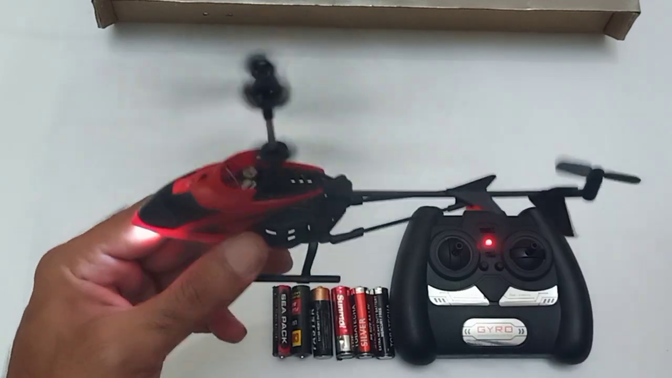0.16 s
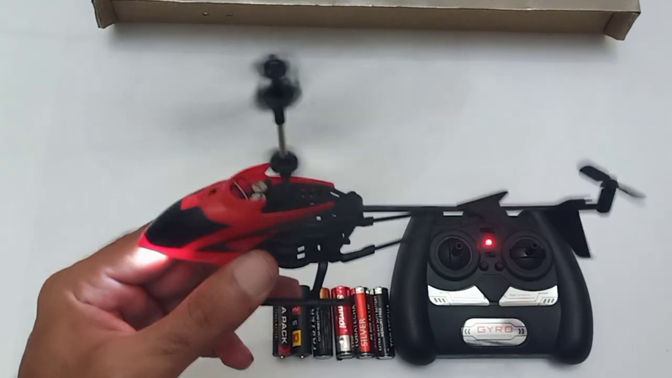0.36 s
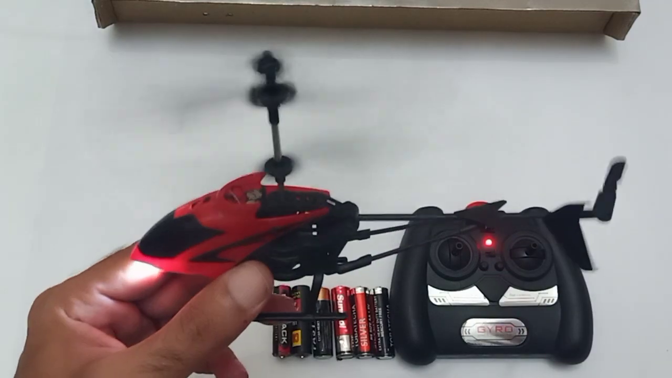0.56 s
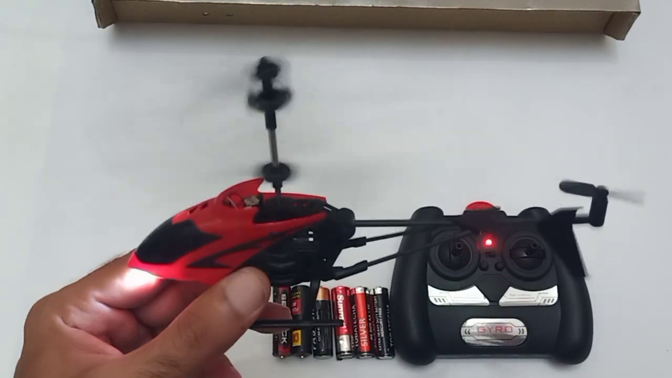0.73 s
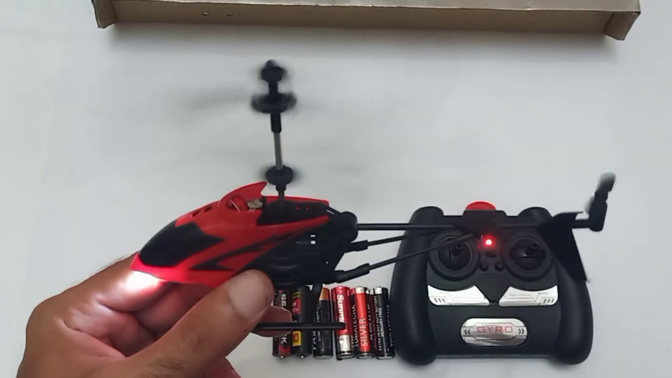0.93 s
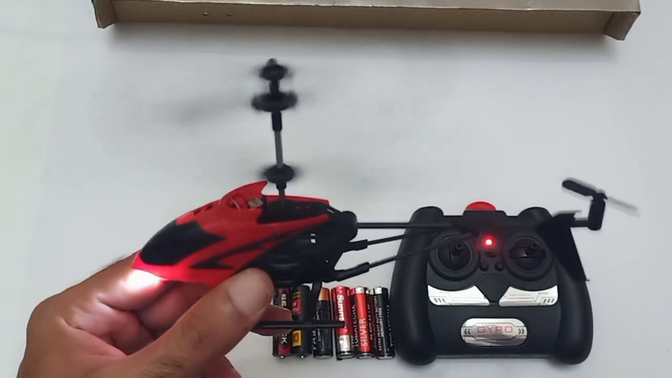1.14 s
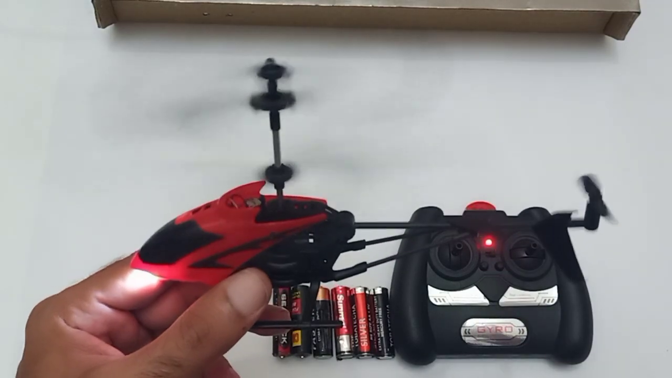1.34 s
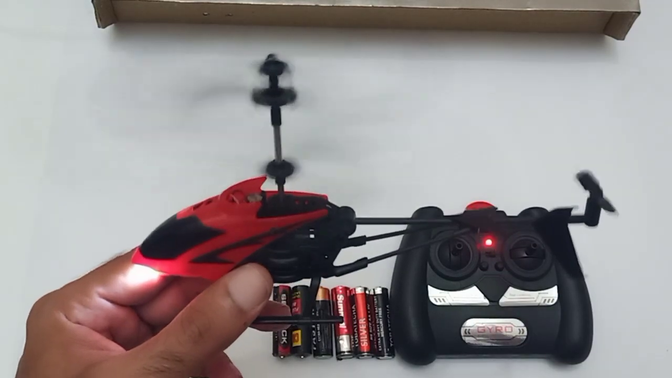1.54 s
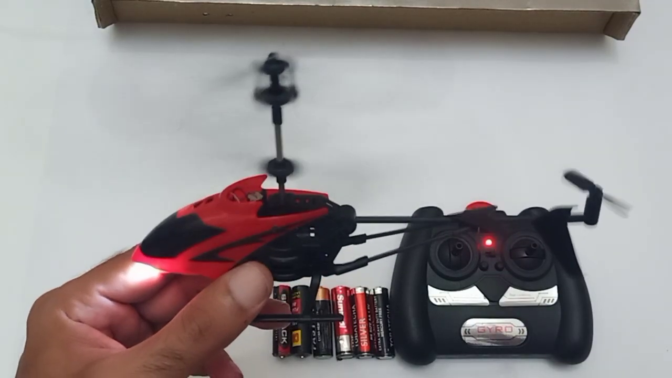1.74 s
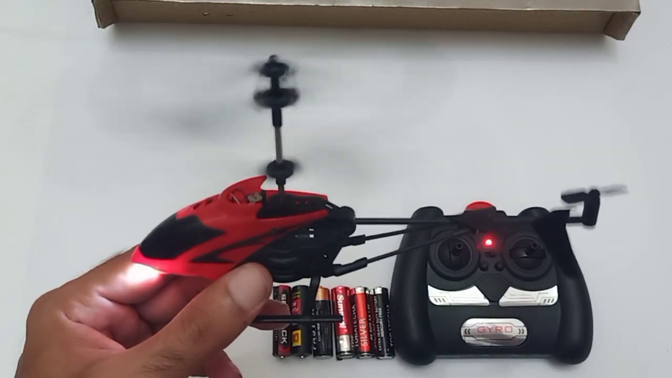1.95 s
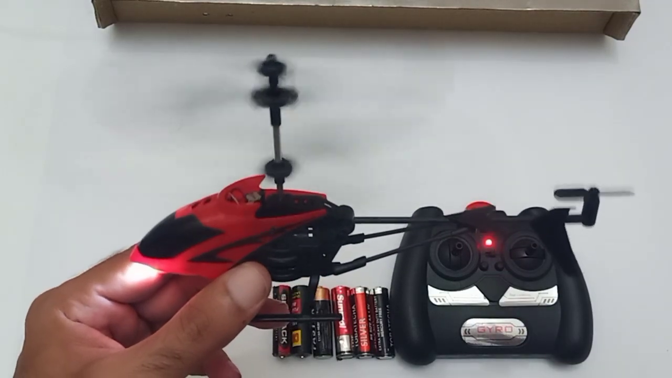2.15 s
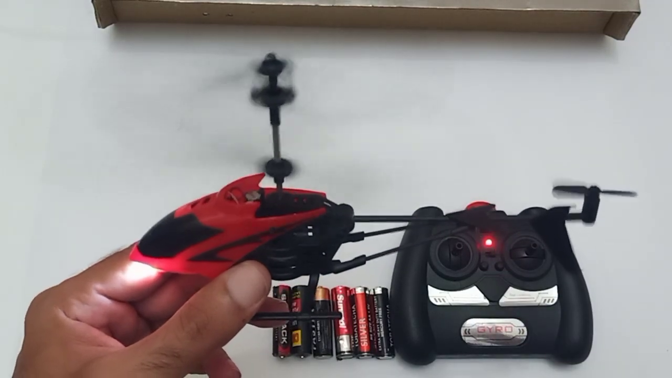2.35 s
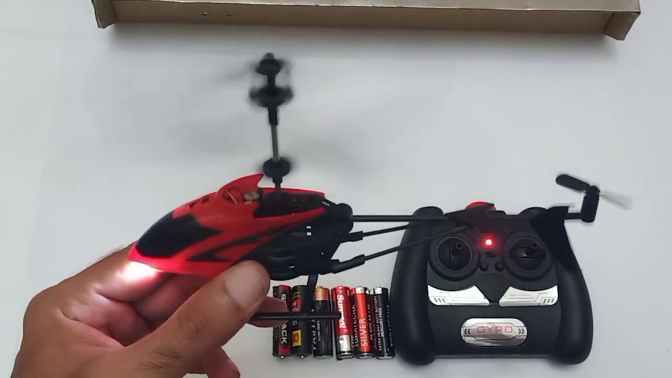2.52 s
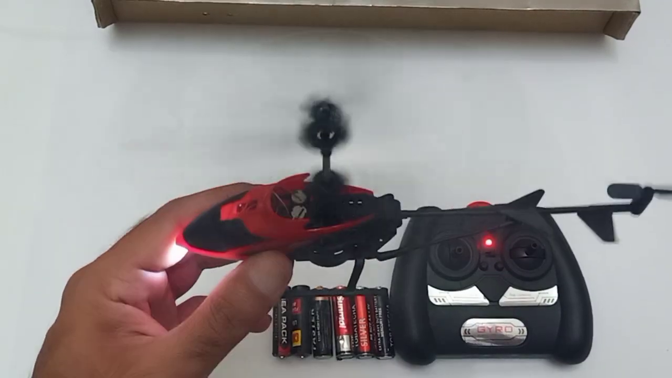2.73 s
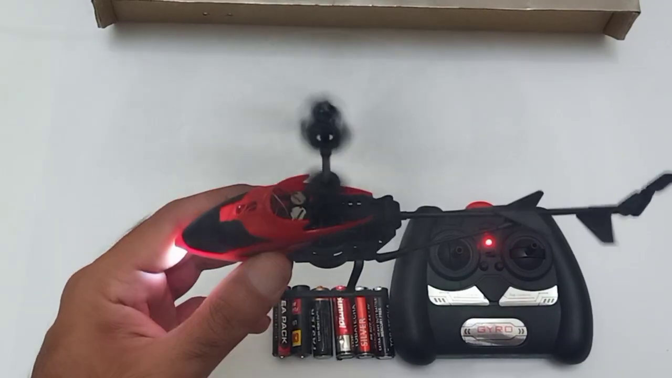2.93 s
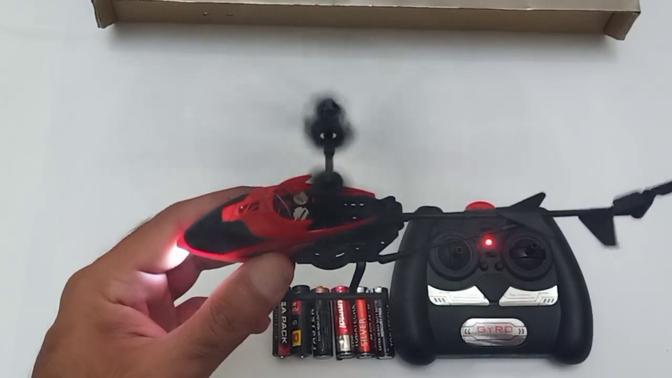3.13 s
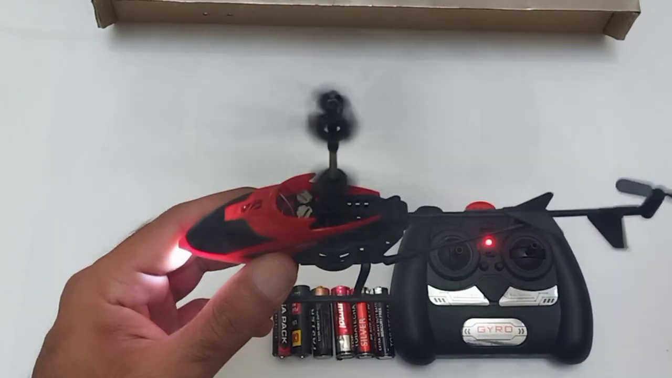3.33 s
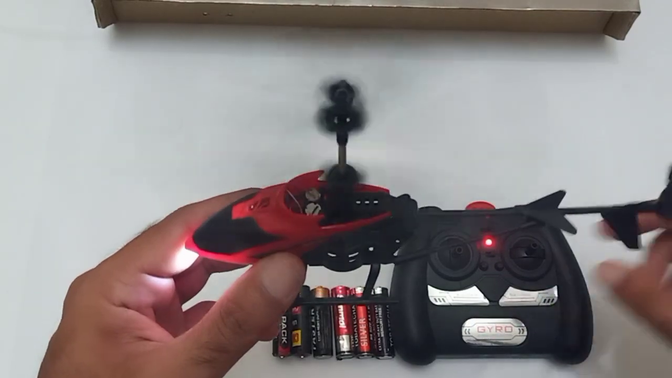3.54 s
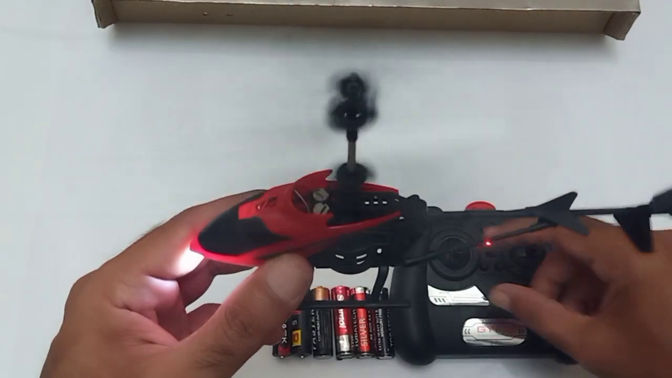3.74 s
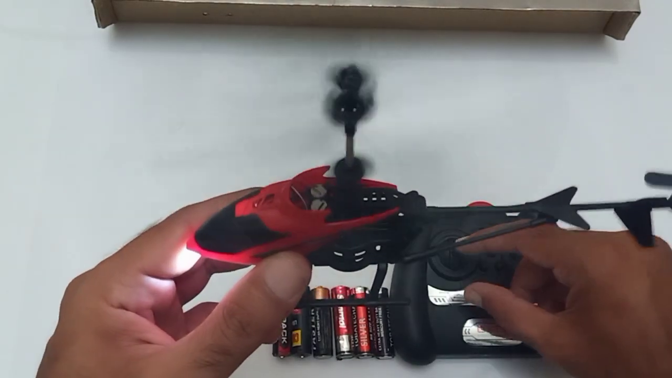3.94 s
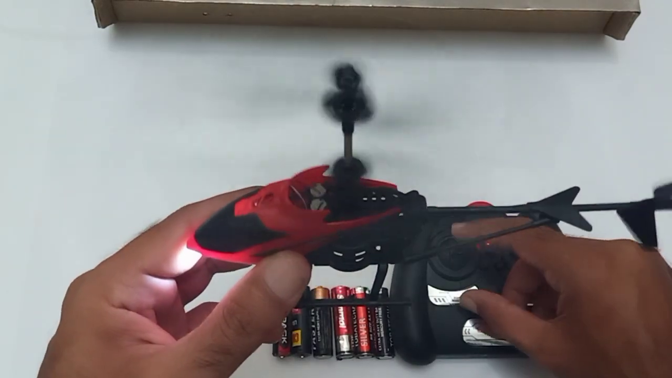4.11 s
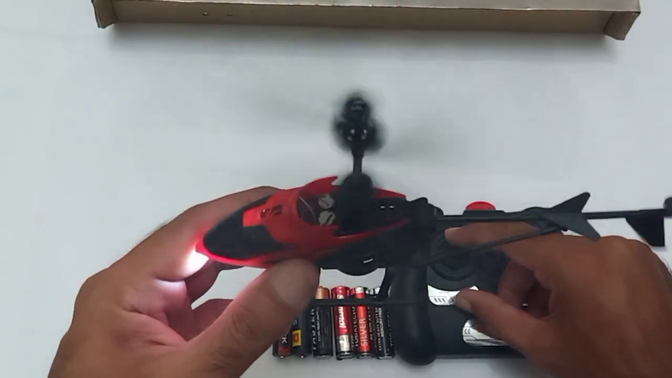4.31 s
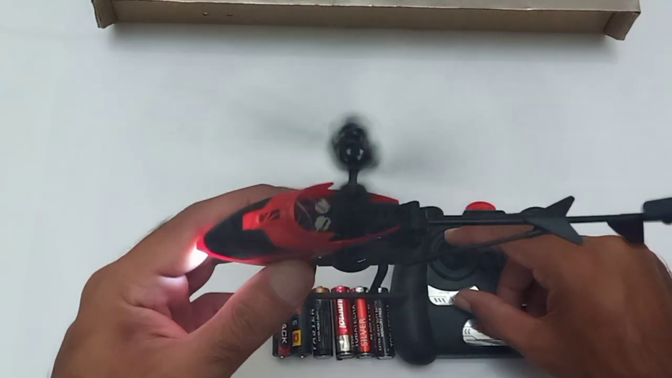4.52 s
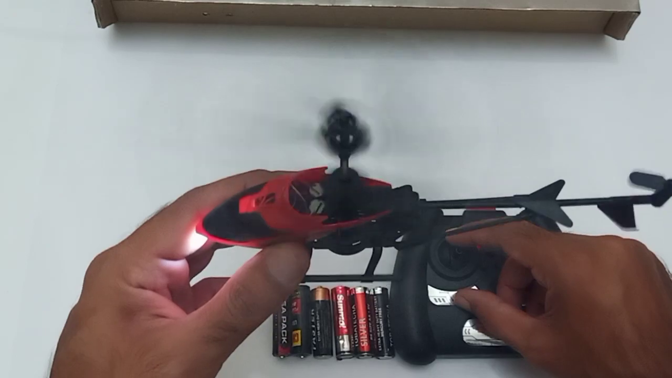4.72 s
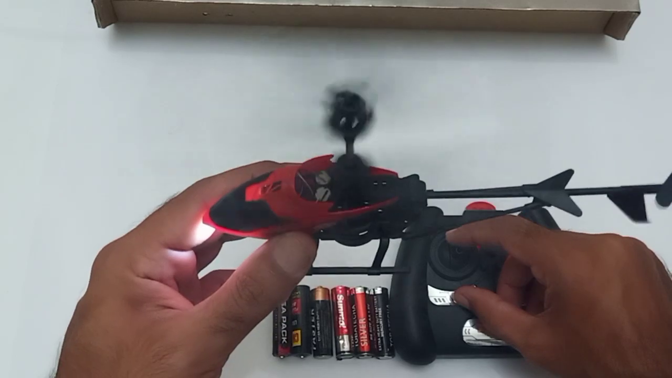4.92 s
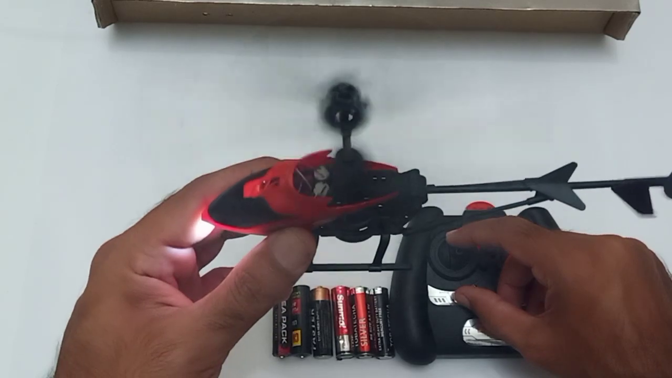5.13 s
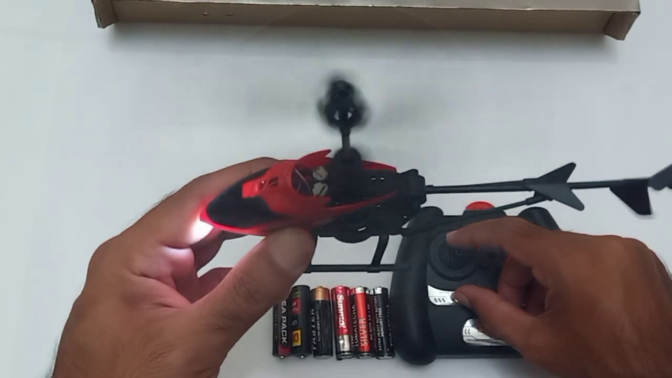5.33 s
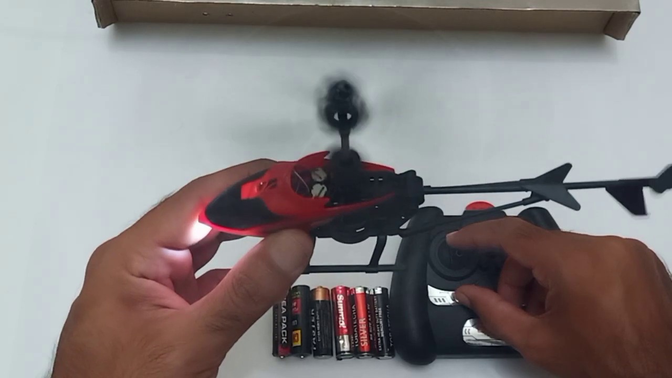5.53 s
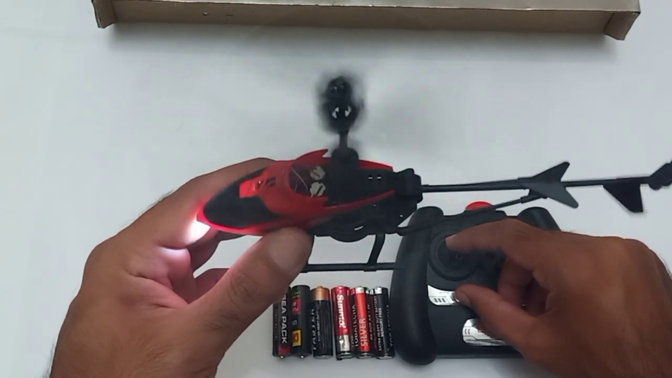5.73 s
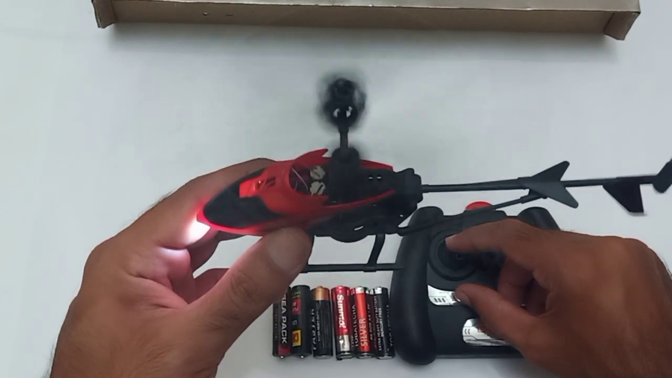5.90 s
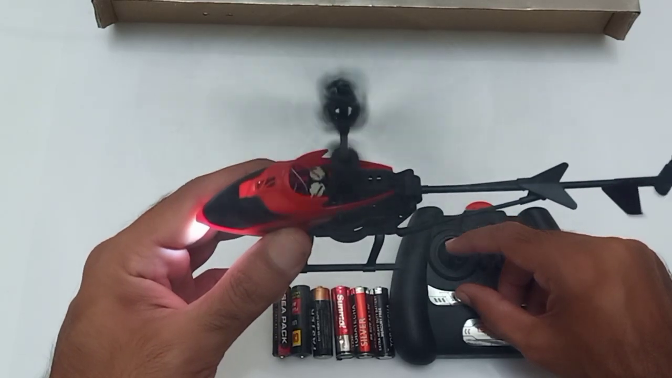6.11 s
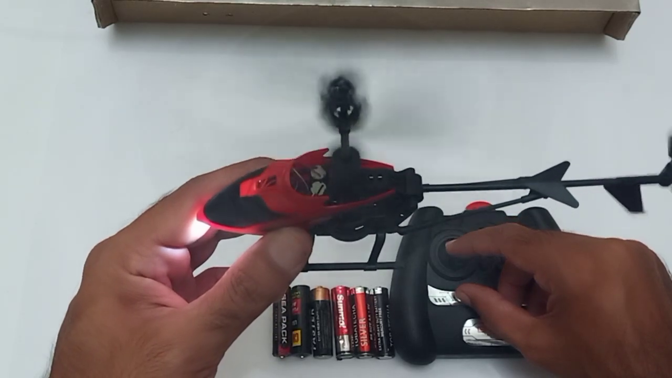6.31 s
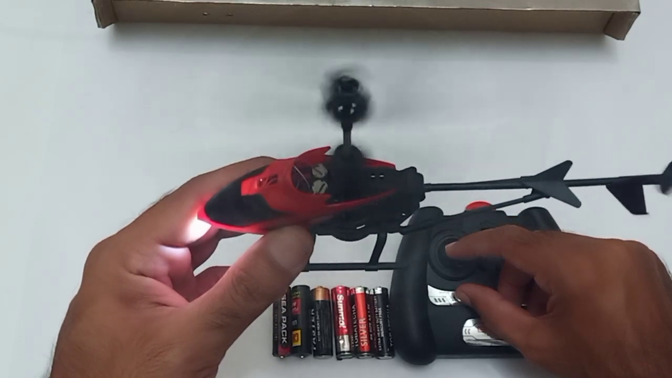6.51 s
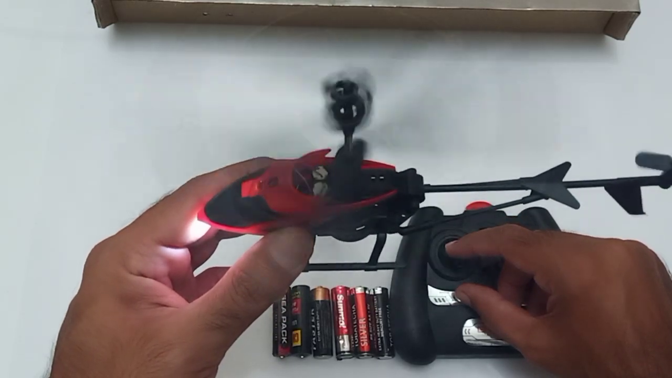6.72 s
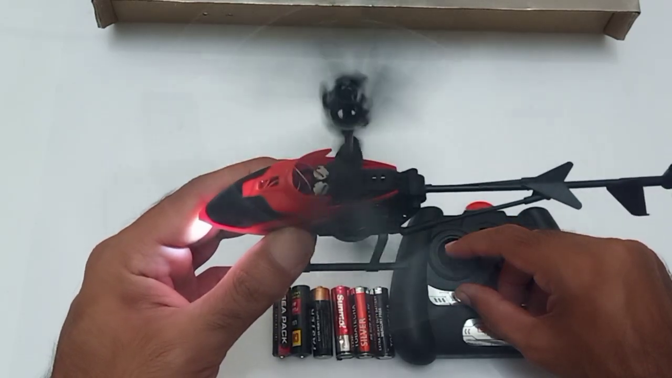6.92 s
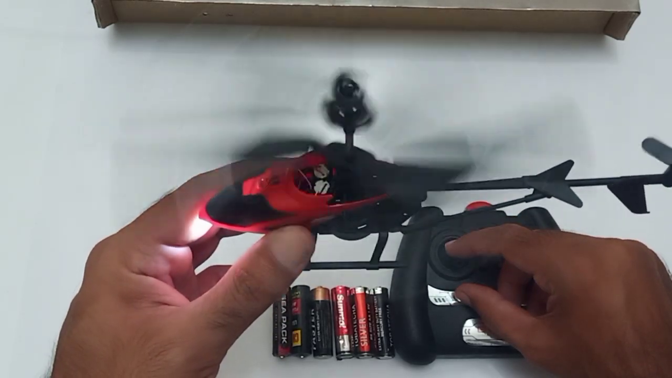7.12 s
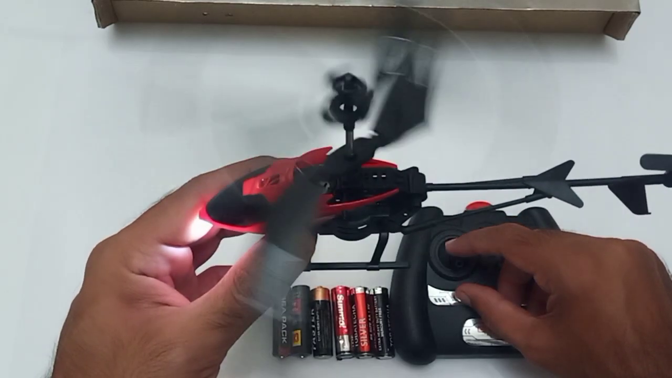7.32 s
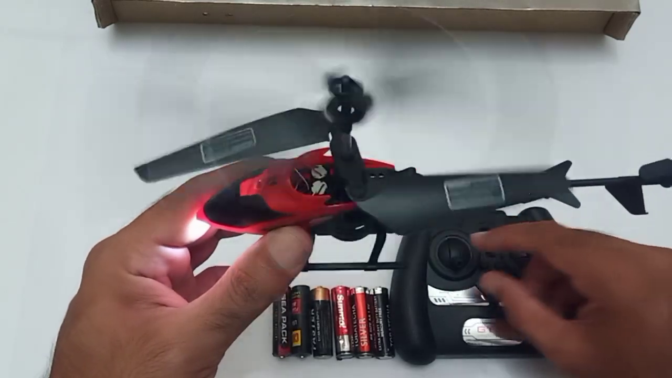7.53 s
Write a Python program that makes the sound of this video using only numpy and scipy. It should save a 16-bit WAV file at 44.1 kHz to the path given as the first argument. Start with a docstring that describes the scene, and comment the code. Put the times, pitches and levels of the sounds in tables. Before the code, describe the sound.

Bright, raspy plastic gear rattle and small motor whine run close up, cut by one brief silence, then slow into uneven ticking knocks indoors.

```python
"""Hand-held toy helicopter running down

A toy helicopter is held in one hand above a desk; two small motors drive counter-turning rotors.
Loose plastic gears rattle (pulsed noise through shell resonances), pinions whine (sines on shaft orders)
and blades throb (beating sines and low noise). The sound drops out for an instant; then power is cut and
the gears coast down, knocking in their play (decaying pulses), over a faint room noise and hum."""
import sys
import numpy as np
from scipy import signal
from scipy.fft import rfft, irfft
from scipy.io import wavfile
from scipy.ndimage import uniform_filter1d

SR = 44100
rng = np.random.default_rng(int(sys.argv[2]) if len(sys.argv) > 2 else 0)


def wrap_up_sound(samples):
    """Save the sound to the file named by the first command line argument, as 16-bit audio."""
    columns = np.atleast_2d(samples).T
    # keep every value between -1 and 1, then stretch to whole-number steps
    tamed = np.clip(columns, -1, 1)
    steps = np.round(tamed * 32767).astype(np.int16)
    wavfile.write(sys.argv[1], SR, steps)


def boost(x):
    """Linear amplitude factor 10**(x/20) for a level x in decibels (scalar or array-like)."""
    u = np.asarray(x, float) / 20
    return 10 ** u


N = 333396
T = np.arange(N) / SR
HZ = np.fft.rfftfreq(N, 1 / SR)

POWER_OFF_S = 6.428
GEAR_RATIO = 10  # shaft turns per rotor turn
FULL_SPEED = (400, 350)  # fast and slow shaft [turns/s]

# mean shaft speeds under power: (time [s], fast shaft [turns/s], slow shaft [turns/s])
POWERED_SPEED = [(0.0, 396.6, 353.8), (0.3, 396.3, 345.0), (0.65, 398.0, 336.5), (1.0, 398.3, 342.0),
                 (1.5, 401.5, 353.8), (1.8, 404.0, 351.4), (2.25, 400.2, 356.6), (2.55, 399.3, 355.3),
                 (2.73, 394.2, 354.5), (3.15, 395.3, 344.6), (3.65, 395.5, 341.9), (4.2, 393.2, 345.6),
                 (4.75, 391.8, 339.0), (4.95, 391.5, 338.9), (5.4, 384.6, 341.6), (5.65, 382.0, 334.0),
                 (5.9, 370.5, 320.7), (6.4, 356.5, 295.0)]
# mean shaft speeds while coasting: (time [s], fast shaft [turns/s], slow shaft [turns/s])
COASTING_SPEED = [(6.548, 270, 190), (6.702, 190, 100), (6.85, 165, 110), (7.101, 130, 55),
                  (7.299, 130, 28), (7.56, 100, 11)]
# how the hand holds the toy: (time [s], loudness [dB], side-on [0 to 1], roll [about -1 to 1])
POSE = [(0.0, 1, 0.3, -0.82), (0.35, 0, 0.67, -0.024), (0.75, 0.5, 0.7, -0.062), (1.0, -0.5, 0.77, 0.26),
        (1.35, 0.5, 0.9, 0.26), (1.7, 0.5, 0.95, 0.094), (2.1, 3.5, 0.72, -1.4), (2.55, 1, 0.81, -0.25),
        (2.75, 2, 0.5, -0.73), (3.0, 1.5, 0.13, -.8), (3.3, -0.5, 0.04, -0.48), (3.9, 0, 0.02, -0.55),
        (4.4, 0, 0, -0.098), (4.8, -0.5, 0.03, 0.22), (5.4, -0.5, 0, -0.26), (5.8, -1.5, 0.22, 0.18),
        (6.2, -2.5, 0, 0.062), (6.37, -4.5, .3, 0.56), (6.42, -9, 0.45, 1)]

# broad spectrum of the gear rattle: (frequency [Hz], relative level per Hz [dB])
RATTLE_COLOUR = [(120, -46), (200, -33), (386, -13.5), (517, -22), (1130, -18.5), (1820, 1), (2270, -8.5),
                 (2440, -2.5), (2980, -4), (6190, 4), (11900, -11), (13600, -2), (15700, 6)]
# shell resonances: (frequency [Hz], width [Hz], boost at the centre [dB])
SHELL = [(377, 290, -5), (944, 190, 4), (1790, 125, 9.5), (2046, 138, 17.5), (2420, 240, 10.5),
         (2744, 130, 5), (3170, 180, 6.5), (3490, 79, 3), (4410, 530, 3), (4470, 190, -7), (5230, 70, 0),
         (5570, 140, 5.5), (5886, 22, 9.5), (6150, 260, 5.5), (6440, 120, 4.5), (6830, 116, 7.5),
         (7730, 200, 4.5), (8270, 170, 3.5), (10800, 230, -3.5), (13360, 320, 10)]
# parts that radiate the rattle: (lower edge [Hz], level [dB], gain side-on [dB], gain per unit of roll [dB],
# loss at full run-down [dB], extra dependence on the knocks at full run-down [dB per dB];
# a negative dependence rings on between knocks)
PARTS = [(254, -46, -5.5, 2, 18, -0.35), (475, -60.5, 1, 0.5, 40, 0), (622, -59.5, 3, 0.5, 34, -0.1),
         (860, -55.5, -2.5, 3, 42, 0), (1013, -55.5, 1.5, 1.5, 34, 0), (1330, -52, -3.5, 0.5, 24, 0),
         (1420, -53, 15.5, -0.5, 52, 0.062), (1984, -53, 10, 0, 27, -0.11), (2264, -41, -4.5, 3, 25, -0.21),
         (3010, -47, -2, 2.5, 26, 0.24), (3290, -48.5, 3.5, -1.5, 38, .6),
         (3894, -39.5, 3.5, 5, 33.5, -0.58), (4390, -46, -13, -1.5, 43.5, .4),
         (5060, -46.5, -13.5, 5, 43, -0.068), (5400, -35.5, 2, 5, 37, -0.68),
         (6510, -41.5, 0.5, -2, 35, -0.14), (7140, -36, 0.5, 3, 36, -0.071), (9750, -40.5, 1, 0, 28, 0.27),
         (10350, -43, 4, 4.5, 42, 0.55), (11260, -44, 0.5, -1.5, 49, .6), (13400, -37.5, 1, 4, 40, 0),
         (14640, -34.5, 0, 2, 41, .2)]
TOP_HZ = 20000  # upper edge of the last part
# backlash knocks of the coasting gears: (time [s], relative peak [dB])
BACKLASH = [(6.446, -17), (6.4514, -18), (6.4567, -14), (6.463, -18), (6.472, -12.5), (6.4824, -24),
            (6.4884, -27), (6.4964, -22.5), (6.5204, -17), (6.5306, -17.5), (6.5347, -13.5), (6.5436, -10),
            (6.5504, -16), (6.5826, -11.5), (6.5924, -19), (6.5986, -13), (6.6084, -18), (6.6207, -17),
            (6.6313, -13), (6.6364, -19), (6.6424, -19), (6.65, -10), (6.672, -20), (6.695, -11),
            (6.6987, -14), (6.7114, -32), (6.721, -15), (6.7334, -14.5), (6.7451, -13.5), (6.7553, -17.5),
            (6.77, -20), (6.7854, -16), (6.8034, -12.5), (6.8114, -21.5), (6.8214, -24), (6.832, -27),
            (6.8414, -24), (6.8523, -30), (6.8628, -20), (6.8724, -25), (6.8834, -24), (6.8942, -22.5),
            (6.9054, -32), (6.9176, -17), (6.9234, -26), (6.9304, -24), (6.984, -18), (7.0103, -22),
            (7.0184, -30), (7.0469, -25), (7.0614, -27.5), (7.0824, -36), (7.1048, -36.5), (7.1234, -36),
            (7.1382, -22), (7.142, -25), (7.1594, -41), (7.1814, -44), (7.206, -30), (7.2194, -29),
            (7.2264, -23), (7.2354, -31), (7.2604, -34.5), (7.2998, -23.5), (7.3164, -31), (7.3254, -37),
            (7.3424, -39), (7.3916, -34), (7.3997, -26.5), (7.4114, -43), (7.4224, -34.5), (7.4414, -45),
            (7.4914, -37), (7.5138, -30), (7.5253, -33)]

# shaft orders of the motor tones: (multiple of shaft speed [-], level against the motor tone [dB])
FAST_MESH = [(7, 0.5), (8, -9.5), (9, -3.5), (15, 3), (16, 4)]
FAST_UNBALANCE = [(.91, -10), (1, -0.79), (1.09, -10)]  # with side tones about one rotor turn away
SLOW_MESH = [(1, -24.5), (6.9, -8.5), (7, 0.5), (7.1, -19), (8, -13.5)]
SLOW_SUB_MESH = [(5, -1.5), (6, -3), (13, -7.5)]
SLOW_OVERTONE = [(13.9, 0.5), (14, 4)]
# motor tones: (level [dB], gain side-on [dB], gain per unit of roll [dB], loss per percent of speed lost [dB])
FAST_MESH_TONE = (-44, -2.5, 2, .5)
SUB_MESH_TONE = (-51.5, 13.5, 0, 0.3)
OVERTONE_TONE = (-66, 21, 7, 1.5)
# sounds that swell on their own: (time [s], slow mesh [dB], fast unbalance [dB], blades [dB])
SWELLS = [(0.0, -40.5, -44, -51), (0.45, -41.5, -53.5, -69), (0.75, -54, -54, -66), (1.1, -43, -51.5, -59),
          (1.5, -38.5, -47, -65), (1.9, -33.5, -45, -65), (2.4, -35.5, -51, -65.5),
          (2.8, -34.5, -46, -45.5), (3.3, -38.5, -44.5, -49.5), (3.65, -41.5, -46.5, -53.5),
          (3.9, -38.5, -48, -52), (4.4, -38.5, -42.5, -46), (4.7, -52.5, -44, -45),
          (5.1, -41.5, -44.5, -47.5), (5.45, -42.5, -39, -51), (5.8, -49, -45.5, -55.5),
          (6.1, -51, -49, -61), (6.4, -55, -50.5, -68)]

# blade tones; mixed rows are blades crossing the other rotor's wake:
# (multiple of fast rotor [-], multiple of slow rotor [-], relative level [dB])
BLADES = [(2, 0, -3.5), (0, 2, -6), (0, 3, -4.5), (2, 2, -6), (2, 3, -17.5)]
# gusts of downwash on the microphone: (time [s], Gaussian half-length [s], level [dB])
GUSTS = [(0.056, 0.05, -48), (.125, .03, -48), (.2, 0.016, -51), (.28, .02, -57), (.38, 0.028, -49),
         (0.574, 0.091, -48.5), (.8, 0.022, -53), (0.913, 0.05, -47), (1.138, 0.028, -56),
         (1.35, 0.06, -39.5), (1.45, .03, -42), (1.523, .025, -42), (1.654, 0.026, -52),
         (2.038, 0.023, -55), (2.13, .025, -55), (2.228, 0.035, -51), (2.37, 0.037, -44.5),
         (2.46, .03, -54), (5.573, 0.035, -45), (6.202, 0.09, -45.5), (6.417, 0.035, -44)]

# ridges and dips that slide in pitch as the hand turns the toy, likely echoes off hand and desk;
# one list each: (time [s], frequency [Hz], level [dB])
SLIDING = [
    [(.3, 9200, -6), (.45, 9700, -2), (.58, 10500, 3), (.75, 11800, 5)],
    [(.45, 7600, -3), (.62, 8800, 4), (.8, 9800, -2), (.95, 10200, -5)],
    [(.4, 8200, 1), (.5, 8800, -4), (.7, 10600, -6), (.9, 11800, 0), (1.2, 12200, 0), (1.35, 12300, 0)],
    [(.45, 13000, -2), (.6, 13800, 2), (.75, 14800, -3)],
    [(.85, 8600, 0), (1.05, 8800, -3), (1.35, 9100, -5), (1.55, 9800, -5), (1.7, 11000, -3),
     (1.85, 11800, 0), (2.5, 11600, -5.5), (2.7, 11600, -0.5)],
    [(.95, 10800, 2), (1.25, 11200, 3), (1.5, 11300, 2), (1.6, 12600, 8), (1.75, 13400, 0)],
    [(2.72, 13000, 0), (2.82, 12600, -8), (2.95, 11200, -2), (3.05, 9700, -6.5), (3.25, 9200, -0.5),
     (3.4, 9100, 2)],
    [(2.8, 15200, 0), (2.9, 14300, 5), (3.0, 13200, 1), (3.18, 11200, 9), (3.3, 10800, 3)],
    [(2.72, 8500, -0.5), (2.8, 8300, 4), (2.95, 7900, 5.5), (3.1, 6900, 2), (3.25, 6600, 0)],
    [(2.95, 15200, 0), (3.1, 14300, -3), (3.3, 12600, 1), (3.6, 12000, 0)],
    [(0, 13400, 1), (.75, 13100, -4), (.9, 13200, 0), (1.35, 13600, -3), (1.68, 13500, -4),
     (1.8, 13400, 2.5), (2.55, 13400, 2), (3.2, 13400, 0), (4.4, 13400, -2)],
]
# thin ridges and dips that hold their pitch while one grip lasts:
# (start [s], end [s], frequency [Hz], Gaussian half-width [Hz], level [dB])
HELD = [(1.5, 2.2, 6340, 110, 3.5), (2, 2.9, 5900, 100, -3), (1.7, 2.5, 6800, 100, -5.5),
        (1.5, 3.1, 7800, 90, 4), (1.3, 2.9, 3850, 100, -3), (.7, 1.7, 3400, 200, -5.5),
        (6.55, 7.1, 530, 120, -7), (1.0, 1.7, 7800, 100, 2), (.65, 1.54, 4050, 360, 2),
        (4.4, 6.4, 7500, 100, -4.5), (4.8, 6.4, 5000, 90, 4.5), (4.4, 7.7, 4750, 90, -5.5),
        (4.8, 5.6, 3700, 90, -2), (4.5, 6.9, 4380, 53, 4), (4.4, 4.8, 6800, 170, -3)]
# narrow bands that swell and sink as the grip shifts: (frequency [Hz], width [Hz])
NARROW = [(2040, 140), (2790, 140), (4370, 290), (4880, 290), (6800, 240), (8200, 700)]
# their course: (time [s], level of each band in turn [dB])
NARROW_DB = [(0, 3, -4, 3, 1, 3.5, 3), (.5, -3, 1, -0.5, 4, -1, 1), (.9, 4, -13, 6.5, 2, -5, -1),
             (1.05, 7, -8, 2, 10.5, -9, 1), (1.45, 3, -2, -3, 0, -4, -3), (1.7, 2, 3.5, -2, -4, 4, 1),
             (2.2, 2, 5.5, 4, -5, -5, -2.5), (2.75, 2.5, 6.5, 7, 1, -2, -4), (2.79, 4, 5, -14, -2, -11, 2),
             (3.2, 1, 1.5, -1, 4, 7, -0.5), (3.7, 1, 1, 1, 1, 1, 2), (3.9, -11, -2, 3, 1, 2, 3),
             (4.35, -8, -2, 0, 1, -3, -0.5), (4.55, 3, -3, 2, -5, 1, 1), (5.2, 1.5, 0.5, 3, -4, 4, 1),
             (6.0, 1, 0, 1.5, 0, 0, -1), (6.5, 5, 5, 3.5, 4, 5, 2), (7.0, 5, 6, 4, 5.5, 2, -3),
             (7.5, -3, -7, 5, -10, -9, 3)]
# bands that briefly go hollow in the dying rattle:
# (time [s], Gaussian half-length [s], frequency [Hz], width [Hz], level [dB])
HOLLOWS = [(7.19, .04, 10900, 1200, -8), (7.28, .035, 3500, 600, -10), (7.28, .05, 11900, 1600, -9),
           (7.375, .03, 3400, 800, -9), (7.37, .035, 11800, 2000, -8), (7.48, .045, 3250, 1100, -16),
           (7.475, .05, 11800, 2400, -12)]

# room noise spectrum: (frequency [Hz], relative level per Hz [dB])
ROOM = [(24, -52), (40, -32), (107, -7), (231, -15.5), (300, 3.5), (531, -20.5), (800, -5), (1400, -12.5),
        (2000, -15), (2600, -44), (4400, -120)]
# steady hum: (frequency [Hz], level [dB])
HUM = [(301.5, -55.5)]


def rms_one(x):
    """Normalisation to unit root-mean-square."""
    return x / np.sqrt(np.mean(x ** 2) + 1e-20)


def in_time(*tables):
    """Linear interpolation of joined tables: each column gives one value per sample."""
    s, *columns = np.transpose(np.vstack(tables))
    return [np.interp(T, s, c) for c in columns]


def colour(points):
    """Spectral shaping: gain per bin, in dB linear over log frequency."""
    hz, level_db = np.transpose(points)
    return boost(np.interp(np.log(HZ + 1), np.log(hz), level_db))


def band(low_hz, high_hz, order=8):
    """Band-pass power law: gain per bin; steep neighbours add up to nearly one."""
    high_pass = 1 / (1 + (low_hz / (HZ + 1)) ** (2 * order))
    low_pass = 1 / (1 + (HZ / high_hz) ** (2 * order))
    return high_pass * low_pass


def noise_through(gain):
    """Filtered white noise, unit rms."""
    return rms_one(irfft(rfft(rng.standard_normal(N)) * gain, N))


def drift(rate_hz):
    """Random modulation: low-passed noise of unit rms."""
    return noise_through(1 / (1 + (HZ / rate_hz) ** 2))


def coasting():
    """Free running: seconds since power was cut."""
    return np.maximum(T - POWER_OFF_S, 0)


def shafts():
    """Angle is the integral of speed: both shafts in turns, with a slight random tremble."""
    speeds = in_time(POWERED_SPEED, COASTING_SPEED)
    return [np.cumsum(speed * (1 + 0.001397 * drift(11.06))) / SR for speed in speeds]


def rattle(fast, slow):
    """Forced resonance: uneven tooth contacts, pulsed by shafts and rotors, ring in the shell."""
    contacts = rng.standard_normal(N) * boost(2.0 * np.minimum(rng.exponential(1, N), 3.3))
    fast_rotor, slow_rotor = fast / GEAR_RATIO, slow / GEAR_RATIO
    pulse_db = (1.06 * np.cos(2 * np.pi * fast) + 0.71 * np.cos(2 * np.pi * slow)
                + 0.28 * np.cos(2 * np.pi * slow_rotor)
                + 0.13 * np.cos(4 * np.pi * (fast_rotor - slow_rotor))
                + 0.38 * np.cos(4 * np.pi * fast_rotor) + 0.28 * np.cos(4 * np.pi * slow_rotor))
    flutter_db = 1.0 * drift(170.0) + 0.54 * drift(50.0)
    knocks = knocking(fast)
    excitation = contacts * boost(pulse_db + flutter_db) * knocks
    return radiation(rfft(excitation) * shell_response(), knocks)


def shell_response():
    """Resonance: causal second-order peaks and dips on top of the broad colour."""
    response = colour(RATTLE_COLOUR).astype(complex)
    for hz, width_hz, boost_db in SHELL:
        detuning = (HZ ** 2 - hz ** 2) / (width_hz * (HZ + 1))
        response *= 1 + (boost(boost_db) - 1) / (1 + 1j * detuning)
    return response


def radiation(spectrum, knocks):
    """Directivity: each part radiates its own band, by pose, run-down and knocks."""
    unload_jolt_db, coast_time_s = 4, 1
    loud_db, side_on, roll = in_time(POSE)
    loud_db = loud_db + unload_jolt_db * (T > POWER_OFF_S)
    run_down = 1 - np.exp(-coasting() / coast_time_s)
    knocks_db = 20 * np.log10(uniform_filter1d(knocks, size=400))
    upper_edges = [part[0] for part in PARTS[1:]] + [TOP_HZ]
    out = np.zeros(N)
    for (low, db, side_db, roll_db, coast_db, hangs), high in zip(PARTS, upper_edges):
        level_db = loud_db + db + side_db * side_on + roll_db * roll
        level_db += run_down * (hangs * knocks_db - coast_db)
        # low parts flicker more, and all parts flicker apart as the gears slow
        patchy_db = 0.23 + 3 * (480 < low < 1500) + 4 * run_down
        level_db += patchy_db * drift(7.4)
        out += boost(level_db) * rms_one(irfft(spectrum * band(low, high), N))
    return out


def knocking(fast):
    """Backlash impacts: unloaded gears rock in their play, short knocks with a weaker, longer tail."""
    rise_ms, t60_s = 0.9, 0.025
    tail_db, tail_t60_s = -12, 0.16
    # small chatter between the loud knocks sinks 6 dB within each fast-shaft turn
    chatter_db = -25 - 13.5 * coasting() + 2.5 * drift(30.0) - 6.0 * (fast % 1)
    dying_drive = boost(-25.0 - 60 * coasting() / 0.03)
    knocks = boost(chatter_db) + dying_drive
    for s, peak_db in BACKLASH:
        age = T[T > s] - s
        decay = boost(-60 * age / t60_s) + boost(tail_db - 60 * age / tail_t60_s)
        rise = 1 - np.exp(-1000 * age / rise_ms)
        knocks[T > s] += boost(peak_db) * decay * rise
    # unit running rms over a quarter second
    knocks = knocks / np.sqrt(uniform_filter1d(knocks ** 2, size=SR // 4))
    return np.where(T > POWER_OFF_S, knocks, 1)


def motors(fast, slow):
    """Gear-mesh and unbalance excitation: tones locked to the two shafts."""
    slow_mesh_db, unbalance_db, _ = in_time(SWELLS)
    return (whine(FAST_MESH, fast, tone_db(FAST_MESH_TONE, shaft=0), waver_db=3.0)
            + whine(FAST_UNBALANCE, fast, unbalance_db, waver_db=1.0)
            + whine(SLOW_MESH, slow, slow_mesh_db, waver_db=1.8)
            + whine(SLOW_SUB_MESH, slow, tone_db(SUB_MESH_TONE, shaft=1), waver_db=2.5)
            + whine(SLOW_OVERTONE, slow, tone_db(OVERTONE_TONE, shaft=1), waver_db=1.2))


def whine(orders, angle, level_db, waver_db):
    """Order synthesis: wavering sines on multiples of shaft angle, fading once power is off."""
    out = np.zeros(N)
    for multiple, order_db in orders:
        level = boost(level_db + order_db + waver_db * drift(32.0))
        out += np.sqrt(2) * level * np.sin(2 * np.pi * (multiple * angle + rng.random()))
    return out * np.exp(-coasting() / 0.012)


def tone_db(tone, shaft):
    """Directivity and load: a motor tone's level follows the pose and changes with speed."""
    level_db, side_db, roll_db, sag_db = tone
    _, side_on, roll = in_time(POSE)
    pose_db = side_db * side_on + roll_db * roll
    return level_db + pose_db - sag_db * speed_lost(shaft) + 1.0 * drift(1.6)


def speed_lost(shaft):
    """Relative slowing: percent below full speed of shaft 0 (fast) or 1 (slow) under power."""
    return 100 * (1 - in_time(POWERED_SPEED)[shaft] / FULL_SPEED[shaft])


def rotors(fast, slow):
    """Blade-passing tones, which beat against each other, and lumpy turbulent downwash."""
    air_lost_db = np.minimum(150 * coasting(), 30)  # falls 150 dB/s, by 30 dB at most
    blade_db = in_time(SWELLS)[2] + 2 * drift(13.0) - air_lost_db
    tones = np.zeros(N)
    for fast_multiple, slow_multiple, db in BLADES:
        turns = (fast_multiple * fast + slow_multiple * slow) / GEAR_RATIO
        tones += np.sqrt(2) * boost(db + 3 * drift(5.1)) * np.sin(2 * np.pi * turns)
    lumpy_noise = rng.standard_normal(N) * boost(2.5 * drift(14.0))
    wash = rms_one(irfft(rfft(lumpy_noise) * band(55, 220, order=1), N))
    gusts = sum(boost(db) * np.exp(-((T - s) / length) ** 2) for s, length, db in GUSTS)
    air = boost(blade_db) * (tones + boost(-5) * wash)
    air += gusts * noise_through(band(60, 120, order=2))
    return irfft(rfft(air) * band(47, 450, order=2), N)   # the microphone loses the deepest bass


def turning(x):
    """Time-varying filtering: frame by frame, ridges and dips raise or lower their slice."""
    sliding_width_hz, grip_shift_s = 530, 0.1
    hz, s, frames = signal.stft(x, SR, nperseg=1024)
    hz = hz[:, None]
    gain_db = np.zeros(frames.shape)
    for track in SLIDING:
        at, centre_hz, level_db = np.transpose(track)
        offset_hz = hz - np.interp(s, at, centre_hz)
        gain_db += np.interp(s, at, level_db) * np.exp(-(offset_hz / sliding_width_hz) ** 2)
    for start, end, centre_hz, width_hz, level_db in HELD:
        held = np.clip(np.minimum(s - start, end - s) / grip_shift_s + 0.5, 0, 1)
        gain_db += level_db * held * np.exp(-((hz - centre_hz) / width_hz) ** 2)
    return signal.istft(frames * boost(gain_db), SR, nperseg=1024)[1][:N]


def grip(x):
    """Parallel band filtering: narrow bands move singly; some bands of the tail briefly drop."""
    bands = [(*narrow, db) for narrow, db in zip(NARROW, in_time(NARROW_DB))]
    for s, length, hz, width_hz, db in HOLLOWS:
        bands.append((hz, width_hz, db * np.exp(-((T - s) / length) ** 2)))
    spectrum, out = rfft(x), x.copy()
    for hz, width_hz, level_db in bands:
        slice_gain = band(hz - width_hz / 2, hz + width_hz / 2, order=40)
        out += (boost(level_db) - 1) * irfft(spectrum * slice_gain, N)
    return out


def room():
    """Stationary background: dull coloured noise and a hum whose level wavers."""
    out = boost(-56) * noise_through(colour(ROOM))
    for hz, db in HUM:
        out += np.sqrt(2) * boost(db + 2.5 * drift(12.0)) * np.sin(2 * np.pi * hz * T)
    return out


def scene():
    """Superposition: all sources add at one microphone, alike in both channels."""
    fast, slow = shafts()
    toy = grip(turning(rattle(fast, slow) + motors(fast, slow)))
    mono = toy + rotors(fast, slow) + room()
    return np.stack([mono, mono])


def top_cut(x):
    """Nothing passes above the cut-off."""
    return signal.sosfilt(signal.butter(12, 15880, fs=SR, output="sos"), x)


def record(dry):
    """Band limiting and gating: the top is cut and the signal drops out for an eighth of a second."""
    cutoff_hz = 15530
    dropout_start_s, dropout_end_s = 2.5768, 2.7035
    dull = irfft(rfft(dry) * (HZ < cutoff_hz), N)
    sounding = (T < dropout_start_s) | (T > dropout_end_s)
    return top_cut(dull * sounding)


dry = scene()
out = record(dry)
wrap_up_sound(out)
```